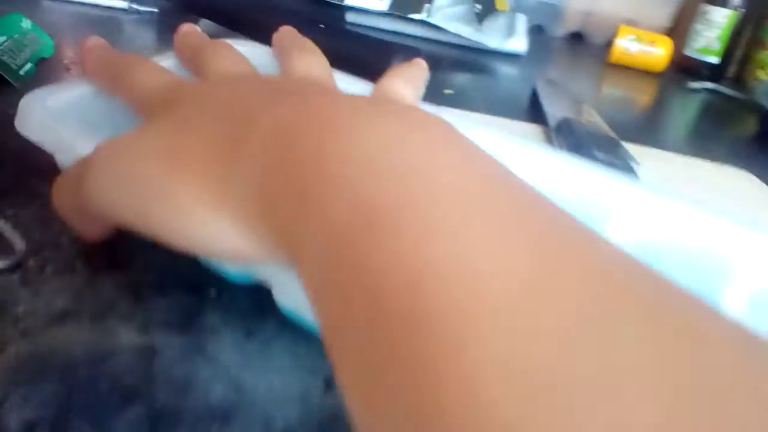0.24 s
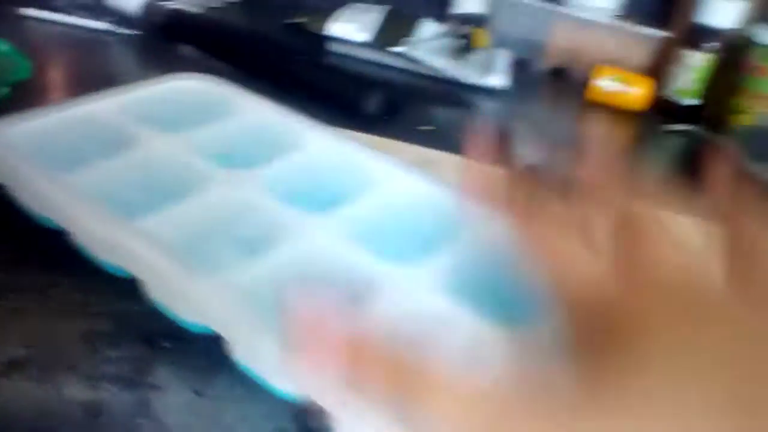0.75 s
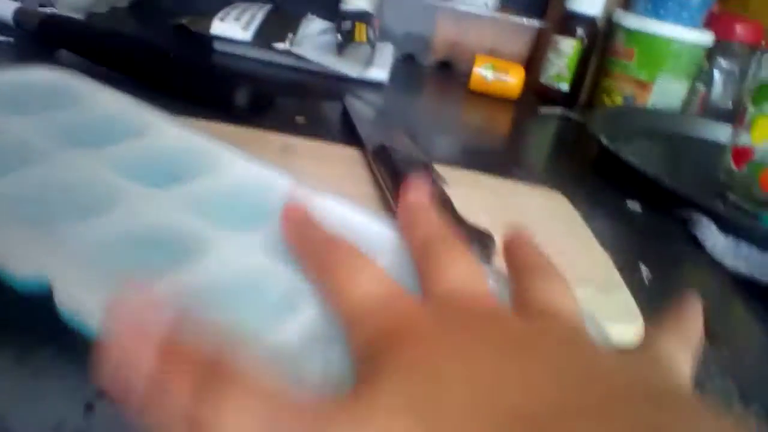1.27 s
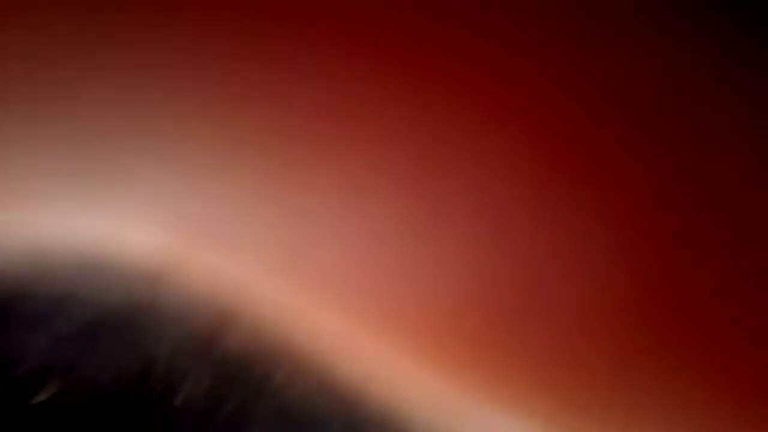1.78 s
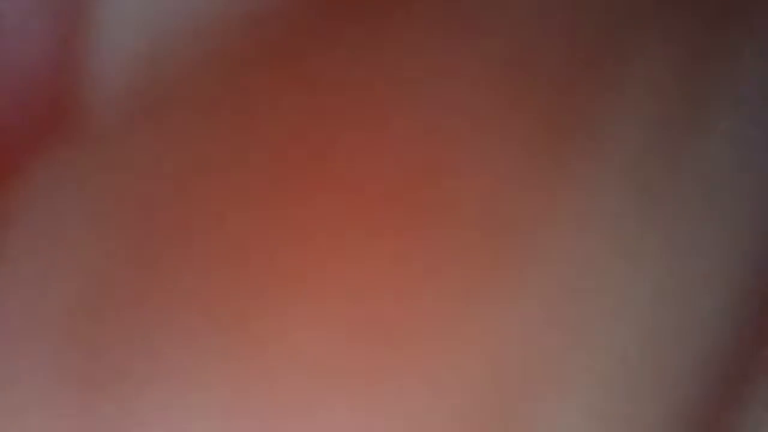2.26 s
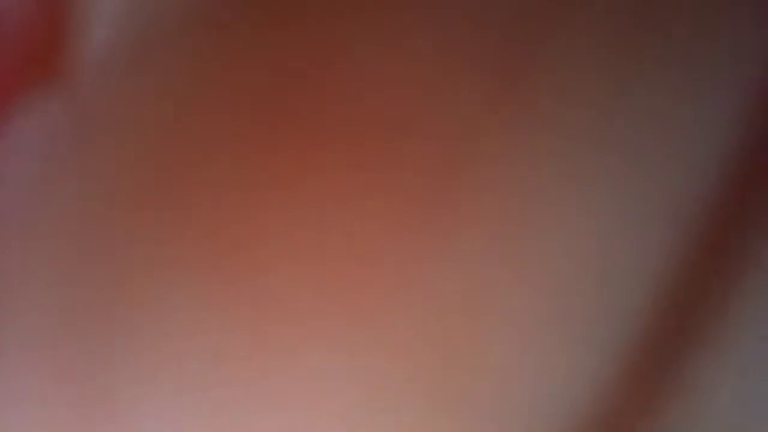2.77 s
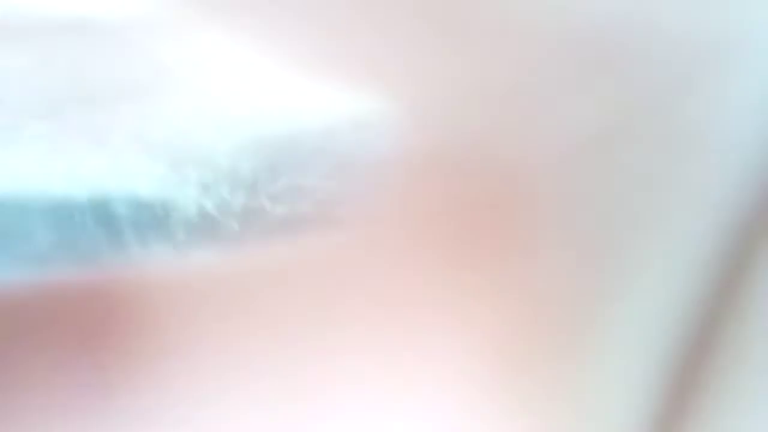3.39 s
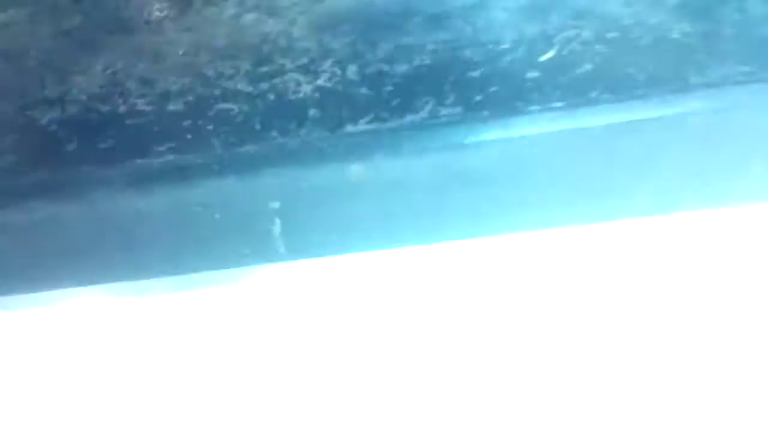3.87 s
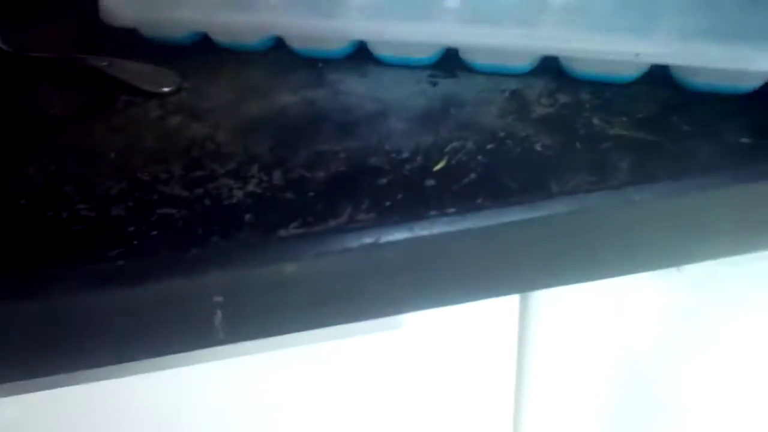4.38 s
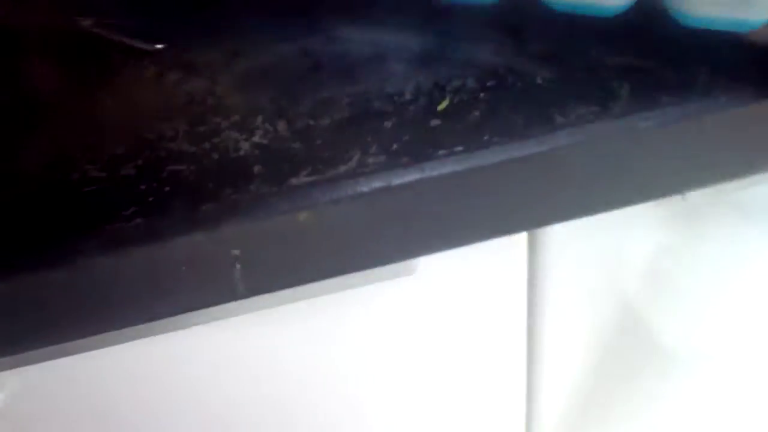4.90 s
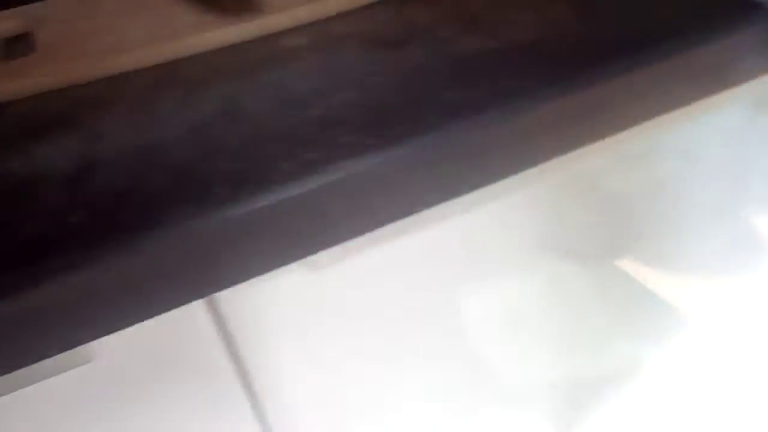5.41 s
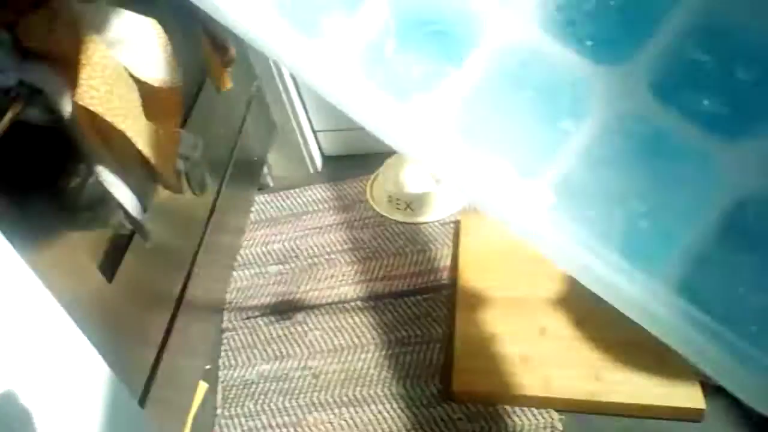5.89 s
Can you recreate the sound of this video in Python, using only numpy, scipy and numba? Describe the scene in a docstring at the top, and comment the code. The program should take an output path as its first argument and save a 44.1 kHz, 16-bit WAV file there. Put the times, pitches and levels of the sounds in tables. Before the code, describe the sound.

From 0 to 0.3 s an ice-filled plastic tray is grabbed on a kitchen counter, giving hollow knocks that grow into a sharp double clack. A strong knock with an ice crack lands at 0.43 s; between 0.58 and 0.9 s comes a busy clatter of knocks, cracks and gritty dragging with loose cubes ticking. Bright cracks snap at about 1.06 and 1.1 s, then two duller knocks at 1.38 s. Each blow rings briefly in a small hard room. At 1.61 s a finger hits the microphone with a huge clipped thump, followed by dry ticks, a tiny falling chirp stutter and hissy rubbing, strongest near 2.0 s. A sharp tick at 2.34 s, fainter rubs to 3.2 s, and small bumps and snaps until 3.5 s. Then faint steady kitchen noise, with light knocks at 4.3 to 4.4, a small icy click at 4.93 and a faint tap at 5.97 s.

```python
"""A plastic tray of ice cubes is grabbed on a kitchen counter: noise bursts and decaying modes make it knock,
filtered grains make it drag, and brighter bursts crack the ice in its cells.
A finger then covers the phone's microphone: pressure pulses bump, dry ticks snap, and hiss rubs over the port.
It lets go, and a few light knocks follow as the tray is picked up.
A small hard room, a decaying noise tail, rings after the blows; behind lies faint steady kitchen noise."""
import sys
import numpy as np
from scipy import signal
from scipy.fft import rfft, irfft
from scipy.io import wavfile
from numba import njit

SR = 44100
rng = np.random.default_rng(int(sys.argv[2]) if len(sys.argv) > 2 else 0)


def pcm_store(signal):
    """Save signal as 16-bit PCM."""
    levels = np.round(np.clip(np.atleast_2d(signal), -1, 1) * 32767)
    wavfile.write(sys.argv[1], SR, levels.astype(np.int16).T)


N = 271126
TIME = np.arange(N) / SR
TOP_HZ = 16300  # the phone passes nothing above this


def undb(db):
    """Decibels to gain."""
    return 10 ** (np.asarray(db) / 20)


def unit(x):
    """Scale to an rms of one."""
    return x / np.sqrt(np.mean(x ** 2) + 1e-20)


def add(track, s, sound):
    """Mix a sound into a track from time s."""
    i = max(int(s * SR), 0)
    track[i:i + len(sound)] += sound[:N - i]


def band(x, lo_hz, hi_hz, order=2):
    """Causal band-pass."""
    edges_hz = [lo_hz, min(hi_hz, SR / 2 - 1)]
    return signal.sosfilt(signal.butter(order, edges_hz, "band", fs=SR, output="sos"), x)


def colour(x, points):
    """Causal filter with the given (Hz, dB) response, built from its cepstrum."""
    size = 4096
    hz, db = np.transpose(points)
    bins_hz = np.fft.rfftfreq(size, 1 / SR)
    response_db = np.interp(np.log(bins_hz + 1), np.log(hz), db)
    cepstrum = irfft(np.log(undb(response_db)))
    # folding the cepstrum forward in time gives minimum phase
    cepstrum[1:size // 2] *= 2
    cepstrum[size // 2 + 1:] = 0
    impulse = irfft(np.exp(rfft(cepstrum)))
    return signal.fftconvolve(x, impulse)[:len(x)]


@njit
def resonate(x, hz, width):
    """Band-pass with a moving centre; width is a share of the centre."""
    y, b, low = np.empty(len(x)), 0., 0.
    for i in range(len(x)):
        g = np.tan(np.pi * hz[i] / SR)
        v = (b + g * (x[i] - low)) / (1 + g * (g + width))
        b, low, y[i] = 2 * v - b, low + 2 * g * v, width * v
    return y


def waver(per_s):
    """Smooth random wandering with a spread of one."""
    knots = np.arange(0, TIME[-1] + 1, 1 / per_s)
    return unit(np.interp(TIME, knots, rng.standard_normal(len(knots))))


def grains(per_s, spread_db):
    """Random tiny slips of uneven size."""
    hits = (rng.random(N) < per_s / SR) * rng.standard_normal(N)
    return unit(hits * undb(spread_db * rng.standard_normal(N).clip(-2, 2)))


def swell(start, fastest, end, range_db, edge_s):
    """Envelope of a sliding contact: it touches, speeds up, slows down and dies away."""
    touch = np.clip((TIME - start) / edge_s + .5, 0, 1)
    release = np.exp(-np.clip((TIME - end) / edge_s, 0, 30))
    return touch * release * undb(np.interp(TIME, [start, fastest, end], [-range_db, 0, -range_db]))


def background(level_db=-68, covered_db=-3, waver_db=1.1):
    """Faint kitchen noise and hiss, wavering a little, and dipping briefly as the finger seals the port."""
    # spectrum of the kitchen: hz, relative density_db
    kitchen = [(25, -15.5), (50, -3.5), (100, 2.5), (210, 0), (350, -4), (560, -5.5), (950, -11),
               (2300, -12.5), (4500, -11), (6200, -11.5), (8100, -25.5), (13500, -28.5), (15200, -13),
               (16500, -28.5)]
    shade_db = np.interp(TIME, [2.3, 2.36, 2.5, 2.6], [0, covered_db, covered_db, 0])
    noise = unit(colour(rng.standard_normal(N), kitchen))
    return undb(level_db + shade_db + waver_db * waver(4.7)) * noise


def kitchen_echo(x, t60=0.34, build_s=0.016, wet_db=-3):
    """Dense reflections off counter, tiles and cupboards build up and fade."""
    # what the surfaces give back: hz, gain_db
    room_colour = [(100, 0.5), (230, -12.5), (450, -10.5), (900, -3.5), (2500, -6.5), (6000, -3),
                   (9000, -6.5), (16000, -13)]
    t = TIME[:SR]
    tail = rng.standard_normal(SR) * (1 - np.exp(-t / build_s)) * 1000 ** (-t / t60)
    echo = signal.fftconvolve(x, tail / np.linalg.norm(tail))[:N]
    return undb(wet_db) * colour(echo, room_colour)


def case(x):
    """Reflections close to the microphone ripple the treble."""
    # off the hand and case: delay_ms, signed share of the treble
    echoes = [(1.05, -0.041), (2.66, 0.21), (4.6, -0.18)]
    treble = band(x, 2000, TOP_HZ)
    return x + sum(share * np.interp(TIME - ms / 1000, TIME, treble, left=0) for ms, share in echoes)


def pressure_pulse(u):
    """Smooth rise and fall of pressure around u = 0."""
    return 1 / np.cosh(np.clip(np.sqrt(2) * u, -20, 20))


def finger_bumps(leak_hz=72, vent_hz=50, push_db=2.0):
    """Each push squeezes the air in the port; the skin recoils, the air leaks away and the pressure swings back."""
    # fingertip pushes on the microphone: start_s (middle of the push), level_db before push_db, length_ms
    bumps = [(1.6135, 1, 0.38), (1.6381, -22.5, 0.57), (1.6818, -25, 0.16), (1.691, -14.5, 0.93),
             (1.7425, -15.5, 0.18), (1.767, -21, 0.16), (1.8203, -13.5, 0.2), (1.8521, -15.5, 0.24),
             (1.9429, -19.5, 0.24), (2.012, -21, 2.6), (2.0237, -18.5, 0.3), (2.079, -22.5, 0.37),
             (2.116, -23.5, 2), (2.212, -26, 1.17), (2.293, -29, 2.1), (2.3365, -5, 0.052),
             (2.7276, -32.5, 0.64), (2.7437, -27.5, 0.71), (3.1904, -18, 0.4), (3.2588, -12, 0.42),
             (3.2787, -21.5, 1.1), (3.294, -27, 2), (3.4063, -35, 1.1), (3.4235, -26, 0.69),
             (3.4407, -14.5, 0.43), (3.4646, -30, 0.55), (3.52, -39, 0.7)]
    recoil_db, recoil_lag, recoil_length = -6.5, 2.4, 3.2  # lag and length in push lengths
    out = np.zeros(N)
    t = TIME[:SR // 20] - 1 / 50  # from 20 ms ahead of the push
    for s, db, ms in bumps:
        u = 1000 * t / ms
        recoil = undb(recoil_db) * pressure_pulse((u - recoil_lag) / recoil_length)
        add(out, s + t[0], undb(db + push_db) * (pressure_pulse(u) - recoil))
    leaked = band(out, leak_hz, TOP_HZ)
    return band(leaked, vent_hz, TOP_HZ, order=1)


def finger_snaps(low_hz=1400, port_hz=3900, port_db=3, snap_db=-2):
    """Skin snaps free of the case: dry noise ticks right at the port, coloured by its resonance."""
    # snaps: start_s, level_db before snap_db, decay_ms (time constant)
    snaps = [(1.6075, -26.5, 3.6), (1.6107, -14, 0.34), (1.732, -15, 0.91), (1.7657, -31, 0.64),
             (1.7992, -20, 1.5), (1.808, -31, 3), (1.8201, -15.5, 0.52), (1.8779, -19.5, 1.6),
             (2.2041, -26, 0.5), (2.2146, -21.5, 0.67), (2.3349, -20.5, 1.3), (2.558, -28, 11.6),
             (2.727, -29.5, 2.3), (2.7422, -25, 1.8), (2.8006, -31, 1.5), (3.4202, -24, 4.9),
             (3.4396, -13.5, 1.3), (3.5201, -34, 3.5)]
    out, t = np.zeros(N), TIME[:SR // 40]
    for s, db, ms in snaps:
        burst = rng.standard_normal(len(t)) * np.exp(-1000 * t / ms)
        port = band(burst, port_hz * .8, port_hz * 1.2, order=1)
        tick = band(burst, low_hz, 13000) + undb(port_db) * port
        add(out, s, undb(db + snap_db) * tick / np.std(tick[:SR // 1000]))  # levelled over the first ms
    return out


def finger_stutters(fall_s=0.00186, chirp_s=0.0017):
    """The fingertip stutters as it seals the port, each skip a short falling chirp."""
    # stutters: start_s, length_s, level_db of the first skip, pitch_hz where the first skip begins
    stutters = [(1.743, .035, -27.5, 3030), (2.202, .004, -22, 2540)]
    skip_s, skip_fade_db, skip_pitch_ratio = .0076, -1, 0.883  # from one skip to the next
    out, t = np.zeros(N), TIME[:SR // 40]
    puff = t / chirp_s * np.exp(1 - (t / chirp_s) ** 2)
    for start, length, db, hz in stutters:
        for k, s in enumerate(np.arange(start, start + length, skip_s)):
            first_hz = hz * skip_pitch_ratio ** k
            phase = 2 * np.pi * first_hz * fall_s * (1 - np.exp(-t / fall_s))
            add(out, s, undb(db + k * skip_fade_db) * band(np.sin(phase) * puff, 300, 8000))
    return out


def air_ring(x, hz, width):
    """An air space rings: the same moving resonance twice over."""
    return unit(resonate(resonate(x, hz, width), hz, width))


def finger_rub(edge_s=0.0055, crackle_db=-12):
    """Skin ridges slip over the port: hiss through its resonance and the hollow under the finger, over a rumble."""
    # finger strokes: start_s, fastest_s, end_s, level_db at the fastest, open_hiss_db, rumble_db,
    # port_hz (resonance at the fastest moment)
    strokes = [(1.6, 1.62, 1.7, -50, 0, 3, 4170), (1.711, 1.755, 1.772, -37.5, 5, 1.5, 4100),
               (1.79, 1.854, 1.866, -31, 1.5, -3.5, 3990), (1.886, 2.013, 2.016, -24, 6, -11.5, 4110),
               (2.062, 2.072, 2.21, -42, 1, 0.5, 4200), (2.17, 2.17, 2.215, -43.5, -7, -19, 4100),
               (2.211, 2.24, 2.329, -33, 6.5, -8, 3677), (2.511, 2.573, 2.59, -37.5, 13, -25, 4250),
               (2.559, 2.562, 2.87, -45, -10, -43, 4030), (2.846, 2.919, 3.14, -52.5, 2, -32.5, 4140),
               (3.001, 3.062, 3.245, -44.5, 4, -19, 4250), (3.3, 3.35, 3.56, -67.5, 2, 4, 4100),
               (3.402, 3.423, 3.445, -35, 9, -2, 4050), (3.457, 3.48, 3.508, -35.5, 7, -14, 4540)]
    # colour of the open skin hiss: hz, gain_db
    skin_colour = [(200, -30), (1100, -14), (1600, -27.5), (2100, 1), (3000, 7.5), (4500, 9), (6500, 5),
                   (8200, 9.5), (11000, 2), (16000, -3.5)]
    swell_db = 10.5  # from first touch to the fastest moment
    port_width, hollow_width = .27, .27  # shares of the resonance
    hollow_ratio, hollow_db = .325, -12.5  # lower resonance, relative to the port's
    hollow_leak = 0.55  # dB that the hollow loses for each dB of open hiss
    port_sag, hollow_sag = .4, 0.53  # octaves per second: the air rings lower as the skin settles
    slips, port_slips = grains(11000, 8.8), grains(12000, 2.5)
    hiss = unit(colour(slips + undb(crackle_db) * grains(280, 0.67), skin_colour))
    tugs = band(grains(300, 1), 68, 990)
    rumble = band(tugs, 48, 260.1, order=1)
    catch = undb(2 * waver(220))  # the skin catches and lets go unevenly
    out = np.zeros(N)
    for start, fastest, end, db, open_db, rumble_db, hz in strokes:
        speed = swell(start, fastest, end, swell_db, edge_s)
        on = speed > .001
        since_fastest = TIME[on] - fastest
        port_hz = hz * 2 ** (-port_sag * since_fastest)
        hollow_hz = hollow_ratio * hz * 2 ** (-hollow_sag * since_fastest)
        hollow = undb(hollow_db - hollow_leak * open_db) * air_ring(slips[on], hollow_hz, hollow_width)
        pocket = air_ring(port_slips[on], port_hz, port_width) + hollow
        rub = unit(pocket + undb(open_db) * hiss[on])
        rub = rub + undb(rumble_db) * unit(rumble[on])
        out[on] += undb(db) * speed[on] * catch[on] * rub
    return out


def sliding(edge_s=.02):
    """Grit scrapes under the tray and loose cubes tick, both louder with speed."""
    # slides over the counter: start_s, fastest_s, stop_s, level_db of the grit at the fastest
    slides = [(-0.1, -0.01, 0.21, -50), (0.26, 0.29, 0.41, -39.5), (0.441, 0.52, 0.56, -37.5),
              (0.578, 0.674, 0.89, -35.5), (0.98, 1.04, 1.18, -43.5), (1.37, 1.467, 1.51, -43.5)]
    # colour of the dragged plastic: hz, gain_db
    drag_colour = [(80, -22), (250, 1), (600, 4), (1100, -5.5), (2400, -2.5), (3300, -7.5), (6500, -18),
                   (16000, -23.5)]
    swell_db = 17.5  # from rest to the fastest moment
    rattle_per_s, rattle_db = 100, -5  # loose cubes, level relative to the grit
    speed = np.zeros(N)
    for start, fastest, stop, db in slides:
        speed += undb(db) * swell(start, fastest, stop, swell_db, edge_s)
    grit = unit(colour(grains(1400, 3), drag_colour))
    rattle = unit(band(grains(rattle_per_s, 1.5), 1500, 2600, order=3))
    return speed * (grit + undb(rattle_db) * rattle)


def contact(knock_db, cell_hz, crack_db, crack_hz, bounce, crumble_db, ring_db=-5, snap_db=14,
            tray_db=-1, thud_db=-19, ice_db=3, cube_db=6):
    """One blow: the whole tray flexes and thuds, one cell knocks, and the ice in it cracks and crumbles."""
    # modes of the tray with its ice: hz before detuning, relative level_db, t60_s
    tray_modes = [(234.3, -21.5, 0.06), (333, -10, 0.024), (412, -17.5, 0.077), (576, -13.5, 0.038),
                  (722, -12, 0.049), (930, -20.5, 0.053), (1100, -25, .1), (1418, -14, 0.052),
                  (2020, -19.5, .08), (2460, -18, 0.11), (2900, -12, 0.057), (3560, -17.5, 0.093),
                  (4360, -16.5, 0.04), (5280, -19, 0.058), (5700, -21.5, 0.057), (6120, -33.5, .1)]
    flex_below_hz, flex_db_per_octave = 540, 11  # the lower the knock, the more the whole tray flexes
    bounce_s, crack_s, crumble_s = 0.0045, .0011, .008  # bounce delay, then two decays
    t = TIME[:SR // 10]
    landing = bounce * (t > bounce_s) * np.exp(-np.abs(t - bounce_s) / crack_s)  # the tray lands again
    crumble = undb(crumble_db) * np.exp(-t / crumble_s)
    blow = rng.standard_normal(len(t)) * (np.exp(-t / crack_s) + landing + crumble)
    blow[0] = undb(snap_db)  # the first instant of the break
    for hz, db, t60 in tray_modes:
        place, force, grip = rng.standard_normal(3)  # where it is hit weights each mode; the grip detunes it
        gain = np.sign(place) * undb(ring_db + db + 2 * force)
        tone = np.sin(2 * np.pi * hz * (1 + 0.00503 * grip) * t)
        blow = blow + gain * tone * np.exp(-np.log(1000) * t / t60)
    weight_db = flex_db_per_octave * np.log2(flex_below_hz / cell_hz)
    flex = band(blow, 180, 510)
    thud = band(np.exp(-t / crack_s), 97, 190)
    knock = band(blow, cell_hz * 0.72, cell_hz * 1.345)
    cube = band(blow, crack_hz * .8, crack_hz * 1.2, order=1)
    crack = band(blow, min(.6 * crack_hz, 2100), 15000, order=3) + undb(cube_db) * cube
    parts = [(flex, knock_db + weight_db + tray_db),
             (thud, knock_db + 1.7 * weight_db + thud_db),
             (knock, knock_db),
             (crack, crack_db + ice_db)]
    attack = SR // 140  # the levels hold over the first 7 ms
    return sum(undb(db) * part / np.std(part[:attack]) for part, db in parts)


def blows():
    """Every knock and crack as it radiates in one direction: heard directly, and as sent into the room."""
    # tray on the counter: start_s, level_db, pitch_hz of the struck cell,
    # click_db of its ice (relative to level_db, before ice_db)
    knocks = [(0.0672, -29.5, 720, -26.5), (0.089, -35.5, 1100, -22.5), (0.1386, -28, 783, -8),
              (0.249, -28, 900, -8), (0.274, -24, 511, -5.5), (0.2775, -20.5, 1030, -9.5),
              (0.4342, -17.5, 890, -19.5), (0.582, -31, 850, -25.5), (0.6077, -33, 1410, -24),
              (0.617, -34, 740, -12.5), (0.626, -26, 780, -2.5), (0.649, -27, 1500, -3),
              (0.6873, -25.5, 1370, -10.5), (0.7033, -25, 700, -9), (0.72, -30.5, 720, -19),
              (0.757, -29, 680, -10.5), (0.848, -38, 634, -13.5), (0.896, -25.5, 680, -8.5),
              (1.03, -50, 336, 3), (1.1037, -33.5, 520, -1), (1.1165, -23, 2000, -11),
              (1.261, -48, 840, -2), (1.277, -48, 720, -9.5), (1.358, -44, 800, -14),
              (1.3826, -25.5, 551, -15.5), (1.3934, -26.5, 620, -13), (1.45, -43, 680, -11.5),
              (3.635, -64, 800, -3), (4.298, -41, 640, -21), (4.305, -51, 387, -6.5),
              (4.394, -47.5, 840, -10.5), (4.406, -46, 600, -11.5), (4.519, -66, 500, 0.5),
              (4.595, -63, 960, 3.5), (4.715, -63.5, 742, -15.5), (4.926, -47.5, 638, -8),
              (5.969, -49, 390, -14.5)]
    # ice cracking in its cells: start_s, level_db before ice_db, centre_hz, room_send_db
    cracks = [(0.2804, -28.5, 2850, -11), (0.4345, -21.5, 2800, 1), (0.626, -26, 2400, -6.5),
              (0.6365, -25, 2400, -7), (0.6862, -28.5, 2230, -13), (0.76, -28.5, 2330, -9.5),
              (0.787, -39.5, 2370, -9.5), (0.808, -40.5, 2300, -8.5), (1.055, -39.5, 2300, -4.5),
              (1.0634, -28, 2350, -3.5), (1.0977, -27, 5700, -5), (1.116, -20.5, 5400, 1.5),
              (1.472, -47.5, 2380, -5.5), (4.9255, -41.5, 3700, -6.5), (5.021, -63, 3400, -14)]
    click_hz, knock_room_db, bounce_db = 2800, -4.5, -4.5
    crack_cell_hz, crack_cell_db = 1888, -10.5  # a crack also jolts the cell around it
    direct, send = np.zeros(N), np.zeros(N)
    for s, db, cell_hz, click_db in knocks:
        blow = contact(db, cell_hz, db + click_db, click_hz, undb(bounce_db), crumble_db=-10)
        add(direct, s, blow)
        add(send, s, blow * undb(knock_room_db))
    for s, db, crack_hz, room_db in cracks:
        blow = contact(db + crack_cell_db, crack_cell_hz, db, crack_hz, 0, crumble_db=-11.5)
        add(direct, s, blow)
        add(send, s, blow * undb(room_db))
    return direct, send


def tray(count=3, drag_room_db=-4):
    """Knocks, cracks and gritty dragging; each wall hears the blows differently, so the echo is diffuse."""
    sides = [blows() for _ in range(count)]
    drag = sliding()
    echoes = [kitchen_echo(send + undb(drag_room_db) * drag) for _, send in sides]
    direct = sides[0][0] + drag
    return case(direct) + sum(echoes) / np.sqrt(count)


def scene(finger_room_db=-27):
    """Tray and finger as the small microphone hears them, over the background."""
    # response of the phone's microphone: hz, gain_db
    microphone = [(20, 4.5), (6600, -2.5), (7400, -14.5), (9000, -22.5), (13500, -25), (15400, -10.5),
                  (16500, -19.5)]
    touches = finger_snaps() + finger_stutters() + finger_rub()
    finger = case(finger_bumps() + touches) + undb(finger_room_db) * kitchen_echo(touches)
    heard = colour(tray() + finger, microphone)
    return (heard + case(background()))[None]


def record(dry):
    """The phone clips whatever passes its ceiling, as the hardest bump does, and cuts the top."""
    ceiling = .71  # of full scale
    clipped = np.clip(dry, -ceiling, ceiling)
    return signal.sosfilt(signal.ellip(10, .2, 70, TOP_HZ, fs=SR, output="sos"), clipped)


dry = scene()
out = record(dry)
pcm_store(out)
```